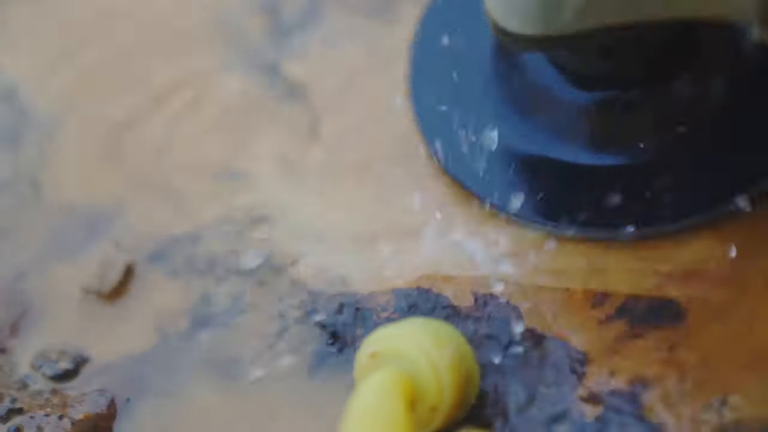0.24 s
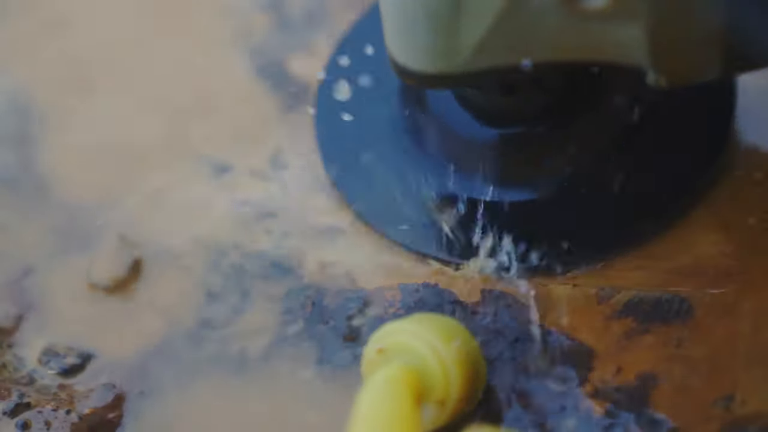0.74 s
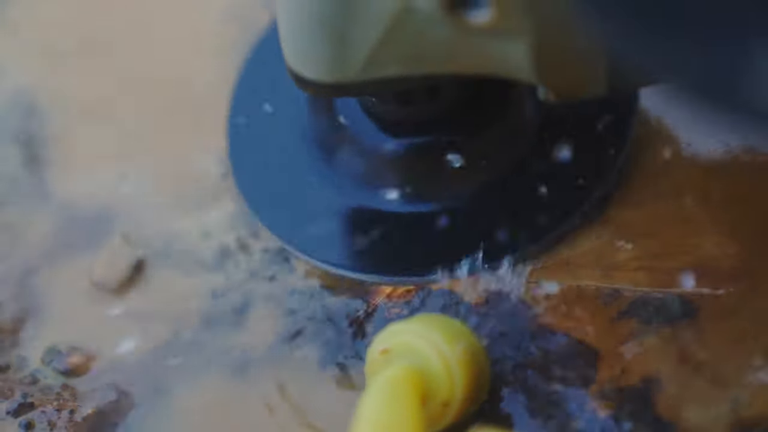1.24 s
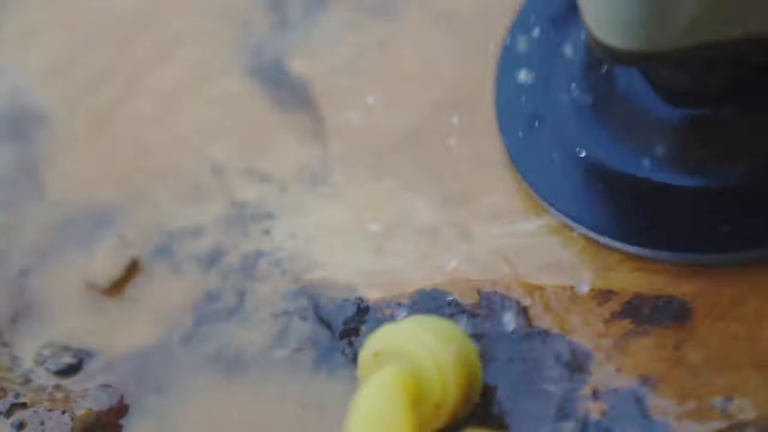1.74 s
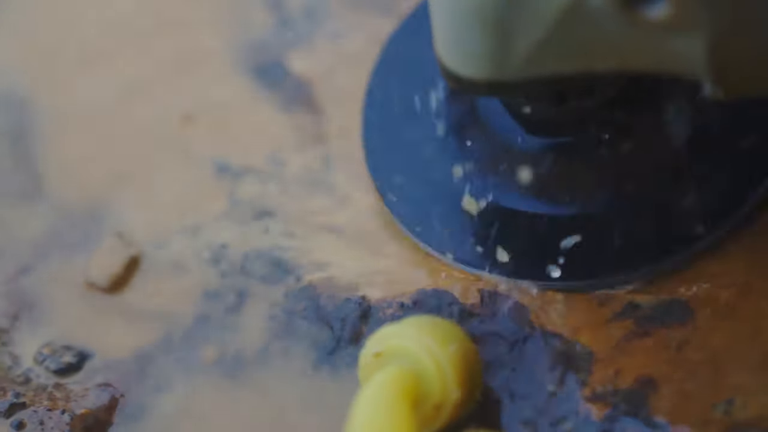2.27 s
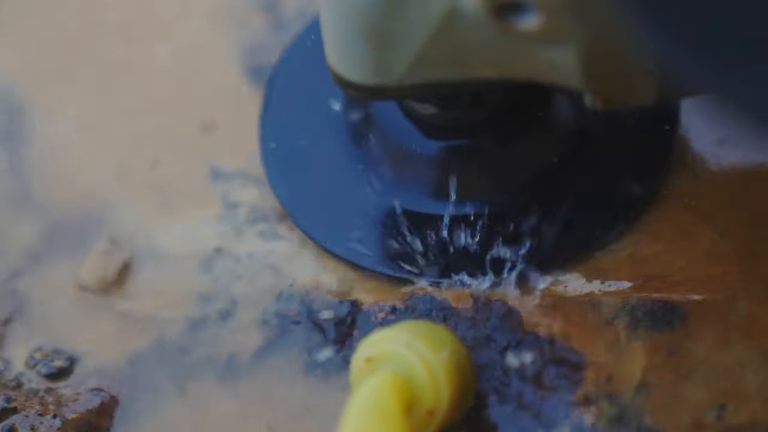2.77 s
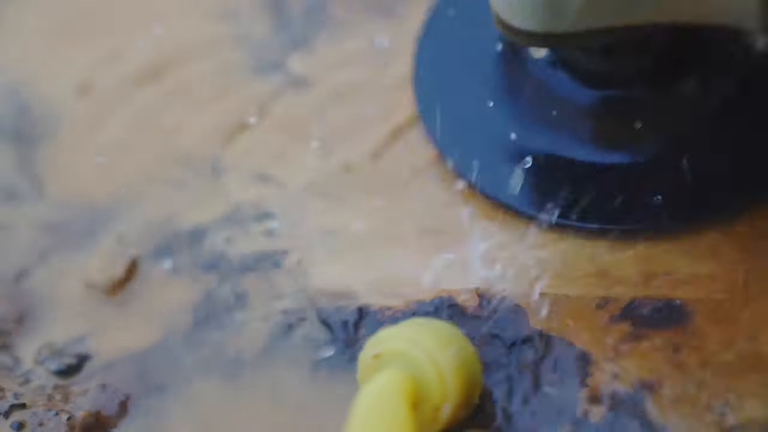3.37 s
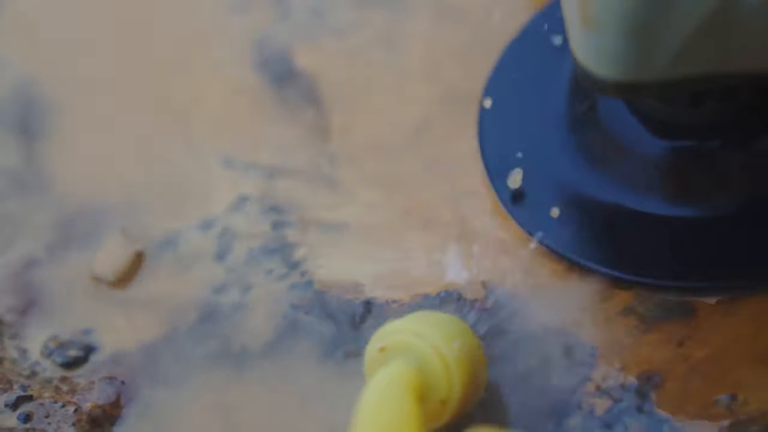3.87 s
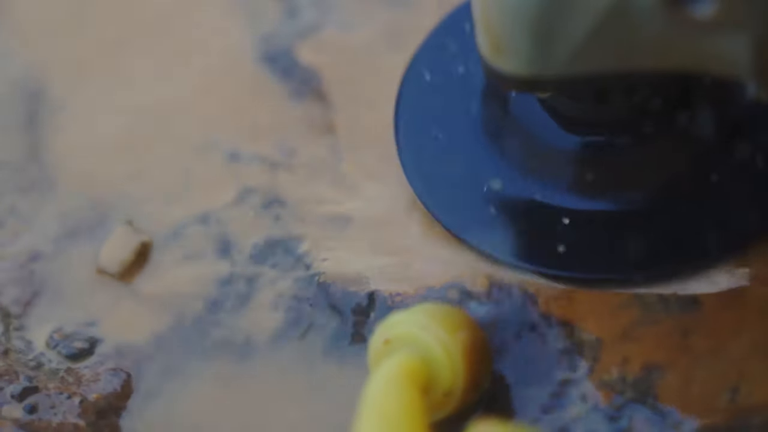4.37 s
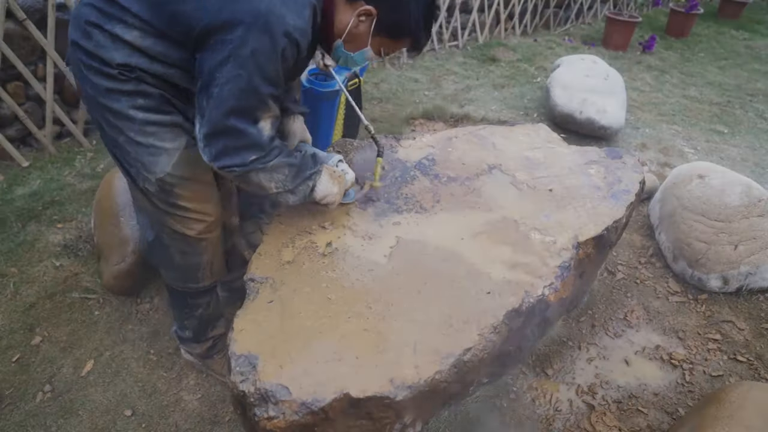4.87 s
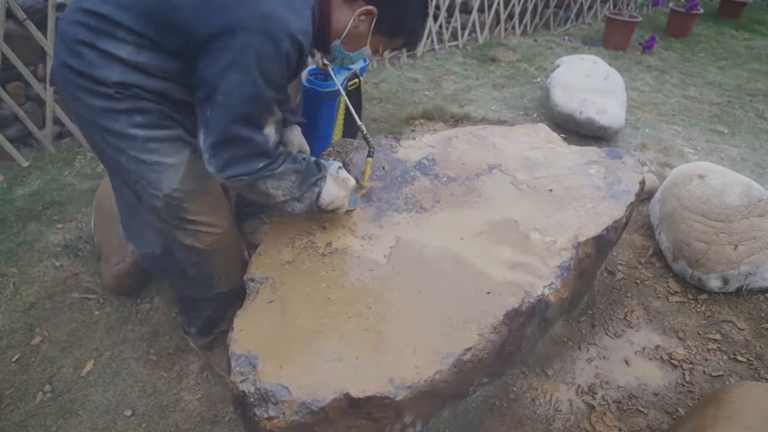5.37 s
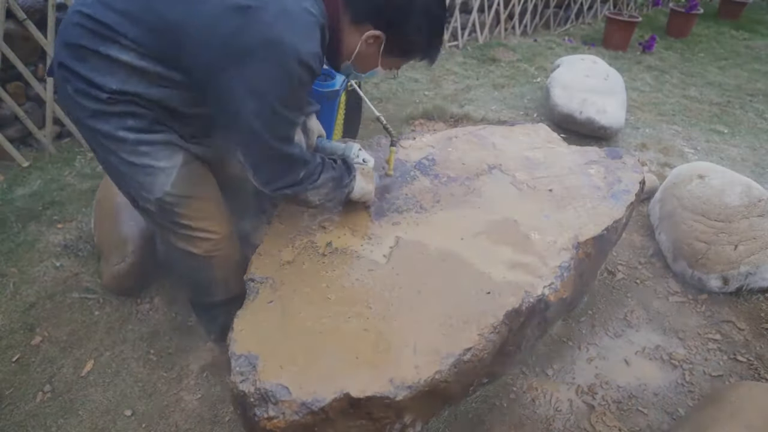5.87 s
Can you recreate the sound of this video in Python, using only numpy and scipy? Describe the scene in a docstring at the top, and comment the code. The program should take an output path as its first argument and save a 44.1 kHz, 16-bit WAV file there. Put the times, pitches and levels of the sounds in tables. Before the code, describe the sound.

A close, harsh rasp of an angle grinder polishing wet stone outdoors. The motor slows and races again as the tool is pressed and eased several times, with gear whine, rattle, fan hiss and occasional screeches. Near the end the same grinding is suddenly heard from a few steps off, thinner and hissier, dipping whenever the pad skips and dotted with brief high squeals.

```python
"""First comes the close, gritty rasp of an angle grinder leaning into a wet stone slab outdoors.
Its pad rubs once a turn over the slurry and screeches when the rim digs in; short squeals poke out.
Under that, the gears whine and rattle, the motor hums and the fan rushes; the spindle slows under
each push and races when eased, and the housing whistles in the last close push. Then we cut to the
same work from a few steps away: a thinner rasp that breaks whenever the pad skips."""
import sys
import numpy as np
from scipy import signal
from scipy.fft import rfft, irfft, next_fast_len
from scipy.io import wavfile
from scipy.ndimage import uniform_filter1d, map_coordinates

SR = 44100
rng = np.random.default_rng(int(sys.argv[2]) if len(sys.argv) > 2 else 0)


def generate_wav(sig):
    """Save sig (samples, or channels by samples) to the path in sys.argv[1] as 16-bit PCM at SR."""
    pcm = np.round(np.clip(np.atleast_2d(sig).T, -1, 1) * 32767).astype(np.int16)
    wavfile.write(sys.argv[1], SR, pcm)


N = 269892

FREE_SPEED_HZ, EASE_S = 109.7, .208  # unloaded spindle; release time of a push
CUT_S, CUT_FADE_S = 4.568, .002  # the jump from close to far
FAR_RASP_DB, FAR_RUB_DB = -22, -46  # faders, ahead of each layer's trim
FAR_PUSH_S, FAR_LEAN_IN_S, FAR_PUSH_DB = 5.4, .059, 5  # a last, harder push deepens the rub
TREBLE_HZ, TOP_HZ = 9700, 15900

# the worker leans on the tool (start/s, end/s, lean-in/s, spindle speed lost/Hz)
PUSHES = [(-.6, .135, .25, 40.5), (.75, 1.6, .285, 36.8), (2.14, 3.326, .216, 37.7),
          (4.06, 4.836, .285, 38.7)]
# how firmly the pad meets the stone; it rides lightly after the third push (t/s, level/dB)
CONTACT = [(0, 1), (1.55, 2), (1.8, -1), (2.3, -0.14), (2.85, 2), (3.4, 1), (3.6, -5.5), (3.85, -6.5),
           (4.0, -2.5), (4.55, -2.5)]
# the rim digs in, late in a push (t/s, length/s, strength)
RIM_DIGS = [(0.074, 0.24, 0.85), (1.438, .38, 0.93), (2.858, .14, 0.65), (3.24, 0.47, 1.04)]
# the pad loses its bite (t/s, length/s, level/dB)
PAD_SKIPS = [(.652, .025, -2.5), (.83, .025, -4), (1.47, .028, -4), (4.04, .025, -3), (4.585, .02, -4),
             (4.825, .02, -3), (5.218, .032, -11), (5.367, .014, -5), (5.548, .03, -8), (5.777, .018, -7),
             (5.866, .014, -5)]
# the eased pad drums on the slab (t/s, length/s, relative level/dB)
PAD_DRUMS = [(.22, 0.14, -58), (0.56, 0.076, -55), (1.62, 0.24, -53.5), (3.445, 0.11, -55),
             (3.966, 0.17, -50)]
# short squeals, and the housing's high whistling ring (t/s, length/s, f/Hz, relative level/dB)
SQUEALS_AND_WHISTLE = [(0.038, 0.13, 2520, -42), (3.19, .1, 2600, -29), (3.34, .1, 3050, -29.5),
                       (4.395, .32, 10550, -34.5), (4.775, .04, 7750, -29), (4.915, 0.06, 2550, -35),
                       (5.047, 0.074, 4560, -29), (5.145, 0.11, 2450, -35.5), (5.299, .073, 7100, -29),
                       (5.335, 0.088, 2700, -35), (5.796, 0.023, 6070, -22), (5.91, .074, 3920, -24.5),
                       (6.065, 0.18, 7660, -28.5)]

# resonator banks (f/Hz, width/Hz, relative level/dB)
PRESSED_MODES = [(2400, 360, 0.5), (3090, 260, -4.5), (4486, 250, 1.5), (4750, 200, -6.5), (5740, 480, -2),
                 (6640, 240, -5), (7500, 280, -4), (8160, 380, 1.5), (8950, 240, 0), (10700, 260, -6.5),
                 (11520, 270, -8), (12760, 300, -5), (14400, 420, -15), (15350, 420, -11)]  # tool pressed on the stone
SCREECH_MODES = [(4390, 160, -7), (5650, 250, -5), (5840, 140, 2)]  # screeching disc
BODY_MODES = [(904, 22, 0), (590, 50, -4), (1255, 35, -8)]  # tool body, shaken by the rub
HOUSING_MODES = [(1923, 220, -9), (4490, 180, -11), (5540, 180, -10.5), (6532, 184, 1), (7840, 130, -0.5),
                 (8150, 97, -1), (8940, 150, 2), (9115, 120, 0.5), (10396, 140, -2.5), (11510, 130, -3),
                 (12770, 160, -6.5), (13100, 160, -18), (14000, 220, -10), (15600, 230, -15)]  # gear housing
FAR_RASP_MODES = [(3790, 440, 1.5), (4070, 140, -2.5), (4370, 290, -2.5), (5640, 360, 4), (6080, 150, 7),
                  (6960, 240, 2), (7700, 78, 4.5), (8200, 240, -8), (9160, 110, -1.5), (10800, 230, -2),
                  (11100, 250, -16), (12850, 250, -19), (13400, 480, -7)]  # the tool from a few steps away

# EQ curves (f/Hz, relative level/dB)
RUB_EQ = [(25, -38), (60, -28), (130, -21.5), (250, -10.5), (450, -9.5), (600, -1.5), (760, -2.5),
          (1100, -4), (1500, -9), (1900, 4.5), (2600, -33), (4000, -30), (16000, -50)]  # pad on stone
GRIT_EQ = [(100, -41), (700, -10.5), (1500, -4.5), (2000, -1.5), (3500, 1), (6000, -3), (9000, -4),
           (9700, -30), (12000, -31), (13600, -26), (16000, -14)]  # crushed grit
FAN_EQ = [(100, -14.5), (500, -0.5), (1100, -12.5), (2000, -6), (5500, 6.5), (9000, 6), (9800, 6.5),
          (16000, 9)]  # rushing air
BODY_EQ = [(800, -51), (872, -57), (906, -35.5), (945, -45), (1020, -65), (1110, -45.5), (1225, -39),
           (1290, -40), (1500, -53), (1900, -41), (2150, -36), (2340, -34.5), (2540, -32.5), (2750, -36),
           (3050, -34.5), (3400, -42)]  # the body's answer to motor tones sweeping through it
FAR_HISS_EQ = [(300, -36), (2900, -17), (3600, -1), (6000, -2), (8500, -8), (11000, -5), (14200, -9),
               (15000, -24), (16000, -24)]  # top of the distant rasp
FAR_RUB_EQ = [(25, -39), (100, -33), (250, -16.5), (500, -14), (750, -8), (1400, -4), (2000, -0.5),
              (2600, 2.5), (3300, 4.5), (5000, -29), (16000, -41)]  # distant pad on stone

# tones locked to the spindle (multiple of its speed, relative level/dB)
WHINE_ORDERS = [(30, -12), (31, -9), (32, 0), (33, -7), (34, -6), (35, -12), (24, -12), (25, -11)]  # meshing teeth
HUM_ORDERS = [(11, -3.5), (12, 0), (13, -13), (14, -4.5), (16, -4), (17, -7), (18, -8), (19, -6.5)]  # armature
DRUM_ORDERS = [(2, -2), (3, -6), (4, -8), (6, -10), (7, -11)]  # drumming pad

# stereo width, close and far (f/Hz, left-right correlation)
CLOSE_IMAGE = [(30, 0.75), (200, 0.99), (600, 0.99), (1500, 0.46), (3000, 0.64), (8000, 0.72),
               (14000, 0.11)]
FAR_IMAGE = [(60, 0.36), (150, 0.98), (380, 0.97), (950, 0.99), (2380, 0.75), (5980, 0.55), (15000, -0.34)]
# unequal paths from the close tool to left and right (f/Hz, left phase lead/rad)
PATH_PHASE = [(0, 0.76), (2410, -0.3), (2760, 1), (3100, -1.3), (4820, -1.03), (5860, -0.38), (7060, -1.9),
              (7750, 1), (8270, -1.45), (9130, -0.7), (10800, -1.3), (14600, -0.34), (15200, -0.82),
              (16000, -0.0)]

# fader rides, ahead of each layer's trim (base/dB, at full load/dB, dB per dB of contact, in a dig/dB)
RUB_RIDE = (-44.5, 5.5, 1.39, -1)
GRIT_RIDE = (-29, -1.04, .82, -.1)
RING_RIDE = (-32.5, 7, 1.05, .5)
SCREECH_RIDE = (-34.5, 0, 1.18, 5)
RATTLE_RIDE = (-23.5, -6, .08, 2.5)
FAN_RIDE = (-30.5, -.8, -.2, 0)
WHINE_RIDE = (-4, 2.5, .66, -.5)
TREBLE_RIDE = (1, -.5, .32, -3.5)  # shelf above TREBLE_HZ on the close tool
PAN_RIDE = (-8, 2.5, .6, 4)  # positive pulls left


def pad(turns, load):
    """The tilted pad bites once a turn, harder under load, crushes grit and sets the disc screeching."""
    rub_db, grit_db, ring_db = ride(load, RUB_RIDE), ride(load, GRIT_RIDE), ride(load, RING_RIDE)
    bite_db = (2.2 + 1.1 * load) * np.cos(2 * np.pi * turns + .25 * wobble(40))

    def scrape(repeat, bite):
        texture = spread(roughness(turns, repeat), CLOSE_IMAGE)
        return texture * amp(bite * bite_db + 1.4 * wobble(100) + 1.8 * wobble(1100))

    rub = amp(rub_db + 4) * coloured(scrape(repeat=.33, bite=1), RUB_EQ)
    ring = amp(ring_db) * ringing(scrape(repeat=.34, bite=.86), PRESSED_MODES)
    grit = amp(grit_db + 4.5) * coloured(scrape(repeat=.32, bite=.61), GRIT_EQ)
    screech_db = ride(load, SCREECH_RIDE)
    screech_db += .66 * (screech_db - screech_db.max())  # takes hold only near its loudest
    screech = amp(screech_db + 1.4) * ringing(scrape(repeat=.31, bite=.46), SCREECH_MODES)
    body = amp(rub_db - 3.5) * ringing(scrape(repeat=.2, bite=.72), BODY_MODES)
    cutting = panned(ring + grit + screech, .53 * ride(load, PAN_RIDE) + .4)
    return shimmer(panned(rub, .56) + panned(body, -.38) + cutting, depth_db=1)


def far_grinder():
    """From a few steps away the tool rasps in its resonances and ducks at every skip of the pad."""
    turns = np.cumsum(95 + 5 * wobble(3)) / SR
    bite = amp(skip_db() + 1.2 * wobble(45) + .3 * wobble(400))
    scrape = lambda: spread(roughness(turns, repeat=.28), FAR_IMAGE) * bite
    rasp = amp(FAR_RASP_DB - .1) * ringing(scrape(), FAR_RASP_MODES)
    hiss = amp(FAR_RASP_DB - 5.5) * coloured(scrape(), FAR_HISS_EQ)
    rub_db = FAR_RUB_DB + FAR_PUSH_DB * rise(FAR_PUSH_S, FAR_LEAN_IN_S)
    rub = amp(rub_db + 6) * coloured(scrape(), FAR_RUB_EQ)
    return shimmer(rasp + hiss + rub, depth_db=1.9)


def gear_rattle(turns, load):
    """Slack gear teeth rattle the housing twice a turn, mostly when running light."""
    knocks = amp(2 * (1 - load) * np.cos(4 * np.pi * turns) + 1.2 * wobble(260) + .8 * wobble(50))
    teeth = spread(roughness(turns, repeat=.52), CLOSE_IMAGE) * knocks
    rattle = unit(shimmer(ringing(teeth, HOUSING_MODES), depth_db=1.8))
    level_db = ride(load, RATTLE_RIDE) - 5 * load ** 2 + 3
    return panned(amp(level_db) * rattle, ride(load, PAN_RIDE) - 3)


def fan(turns, load):
    """The fan's bright rush flutters behind the gears."""
    flutter_db = 2.6 * wobble(90) + 1.4 * wobble(500)
    rush = coloured(spread(roughness(turns, repeat=.58), CLOSE_IMAGE), FAN_EQ)
    return panned(amp(ride(load, FAN_RIDE) + flutter_db) * rush, ride(load, PAN_RIDE) + .36)


def squeals_and_whistle(width_hz):
    """Short squeals, and a high whistling ring of the housing in the last close push."""
    def band(hz):
        return unit(filtered(rng.standard_normal(N), lambda f: np.exp(-((f - hz) / width_hz) ** 2)))

    return sum(amp(db + .5) * swell(t, length) * band(hz) for t, length, hz, db in SQUEALS_AND_WHISTLE)


def motor(turns, speed, load):
    """The armature hums, and the gear teeth whine louder the harder the pad cuts."""
    body_db = lambda k: along(BODY_EQ, k * speed)
    hum = amp(-.5 - 2 * load) * tones(turns, HUM_ORDERS, body_db, flutter_db=2.8, flutter_hz=24)
    chatter = amp(2.2 * np.cos(2 * np.pi * turns) + 1.8 * wobble(220))
    teeth = chatter * tones(turns, WHINE_ORDERS, body_db, flutter_db=2.2, flutter_hz=45)
    whine = amp(ride(load, WHINE_RIDE)) * teeth
    return panned(hum, -3.5) + panned(whine, -9)


def slab(turns, load):
    """A faint low bed: the off-centre pad shakes the slab and drums on it when eased."""
    shake = amp(-74 + 7.7 * load + 1.7 * wobble(16)) * unit(np.sin(2 * np.pi * turns))
    drum_gain = sum(amp(db) * swell(t, length) for t, length, db in PAD_DRUMS) + amp(-69 - 6.5 * load)
    return shake + drum_gain * tones(turns, DRUM_ORDERS, lambda k: 0, flutter_db=5, flutter_hz=10)


def spindle_speed():
    """Turns per second: each push drags the spindle down until it is eased."""
    return FREE_SPEED_HZ - sum(lost * rise(start, lean_in) * (1 - rise(end, EASE_S))
                               for start, end, lean_in, lost in PUSHES)


def ride(load, settings):
    """A fader curve in dB that follows load, pad contact and rim digs."""
    base, by_load, by_contact, by_dig = settings
    contact_db = np.interp(clock(), *np.transpose(CONTACT))
    dig = sum(strength * swell(t, length) for t, length, strength in RIM_DIGS)
    return base + by_load * load + by_contact * (contact_db - contact_db.mean()) + by_dig * dig


def skip_db():
    """The dip in level while the pad skips."""
    return sum(db * swell(t, length) for t, length, db in PAD_SKIPS)


def roughness(turns, repeat, bumps_per_turn=440):
    """Two unrelated textures met by a turning part; each turn partly repeats the one before."""
    noise = rng.standard_normal((2, 700, bumps_per_turn))
    tracks = signal.lfilter([1], [1, -repeat], noise, axis=1)
    position = turns * bumps_per_turn
    return unit(np.array([map_coordinates(track.ravel(), [position], mode="wrap") for track in tracks]))


def tones(turns, orders, eq_db, flutter_db, flutter_hz):
    """Spindle harmonics fluttering in level and phase; eq_db(k) shapes harmonic k."""
    tone = lambda k: np.sqrt(2) * np.sin(2 * np.pi * k * turns + .6 * wobble(flutter_hz))
    return sum(amp(db + eq_db(k) + flutter_db * wobble(flutter_hz)) * tone(k) for k, db in orders)


def ringing(x, modes):
    """x through a resonator bank, at rms 1."""
    peaks = lambda f: [amp(db) / (1 + 2 * ((f - hz) / width) ** 2) for hz, width, db in modes]
    return unit(filtered(x, lambda f: np.linalg.norm(peaks(f), axis=0)))


def coloured(x, eq):
    """x through an EQ curve, at rms 1."""
    return unit(filtered(x, lambda hz: amp(along(eq, hz))))


def shimmer(x, depth_db):
    """The colour shifts at random over some 50 ms and a few hundred Hz."""
    spectra = signal.stft(x, nperseg=512)[2]
    patches = uniform_filter1d(rng.standard_normal(spectra.shape[1:]), size=4, axis=0)
    patches = uniform_filter1d(patches, size=9, axis=1)
    return signal.istft(spectra * amp(depth_db * unit(patches)), nperseg=512)[1][:, :N]


def spread(pair, image):
    """Two unrelated signals, mixed as mid and side to a given stereo width."""
    angle = lambda hz: np.arccos(np.clip(along(image, hz), -1, 1)) / 2
    mid, side = filtered(pair, lambda hz: np.array([np.cos(angle(hz)), np.sin(angle(hz))]))
    return np.array([mid + side, mid - side])


def panned(x, left_db):
    """Pan to left_db of left over right, holding the mid level."""
    gains = amp(np.array([left_db, -left_db]).reshape(2, -1) / 2)
    return x * gains / gains.mean(0)


def filtered(x, response):
    """x through a frequency response."""
    size = next_fast_len(N + SR // 4)
    return irfft(rfft(x, size) * response(np.fft.rfftfreq(size, 1 / SR)), size)[..., :N]


def along(points, hz):
    """Read (f/Hz, value) points on a log frequency axis."""
    f, values = np.transpose(points)
    return np.interp(np.log(hz + 1), np.log(f + 1), values)


def wobble(rate):
    """A smooth random modulator, rate knots a second."""
    return map_coordinates(rng.standard_normal(int(N * rate / SR) + 4), [clock() * rate])


def swell(t, length):
    """A rounded hump of height 1 around time t."""
    return np.exp(-np.abs(2 * (clock() - t) / length) ** np.e)


def rise(t, length):
    """A smooth fade from 0 to 1 around time t."""
    return .5 + .5 * np.tanh((clock() - t) / length)


def clock():
    """Time of every sample."""
    return np.arange(N) / SR


def amp(db):
    """Decibels to gain."""
    return 10 ** (np.asarray(db) / 20)


def unit(x):
    """Scale to rms 1."""
    return x / np.sqrt(np.mean(x ** 2) + 1e-20)


def scene():
    """The close grinder cuts to the far one, with squeals over both."""
    speed = spindle_speed()
    turns = np.cumsum(speed * (1 + .0013 * wobble(30))) / SR
    load = (speed.max() - speed) / np.ptp(speed)  # 0 running light, 1 at the hardest push
    close = motor(turns, speed, load) + slab(turns, load)
    close += amp(skip_db()) * (gear_rattle(turns, load) + fan(turns, load) + pad(turns, load))
    treble = filtered(close, lambda hz: hz > TREBLE_HZ)
    close += (amp(ride(load, TREBLE_RIDE)) - 1) * treble  # the top dulls while the rim digs in
    # so near, each resonance reaches left and right along its own paths
    close = filtered(close, lambda hz: np.exp(.5j * np.outer([1, -1], along(PATH_PHASE, hz))))
    away = rise(CUT_S, CUT_FADE_S)
    return (1 - away) * close + away * far_grinder() + squeals_and_whistle(width_hz=290)


def record(dry):
    """A brick-wall low-pass on the mix."""
    return filtered(dry, lambda hz: hz < TOP_HZ)


dry = scene()
out = record(dry)
generate_wav(out)
```